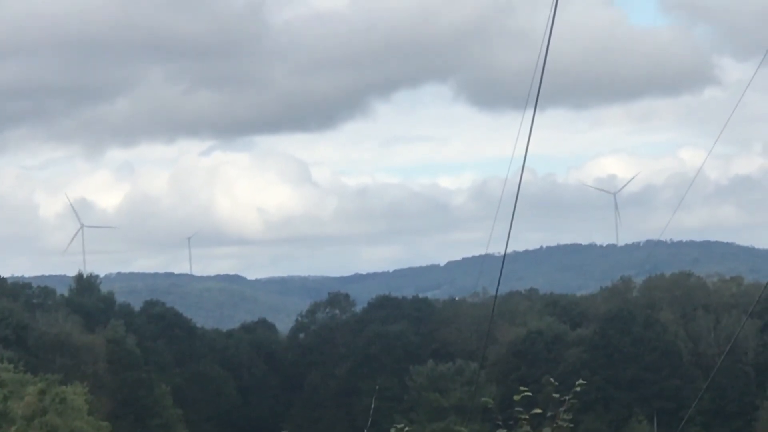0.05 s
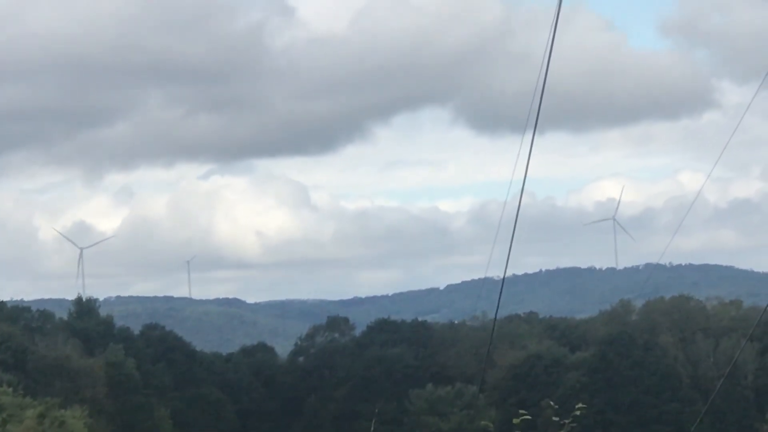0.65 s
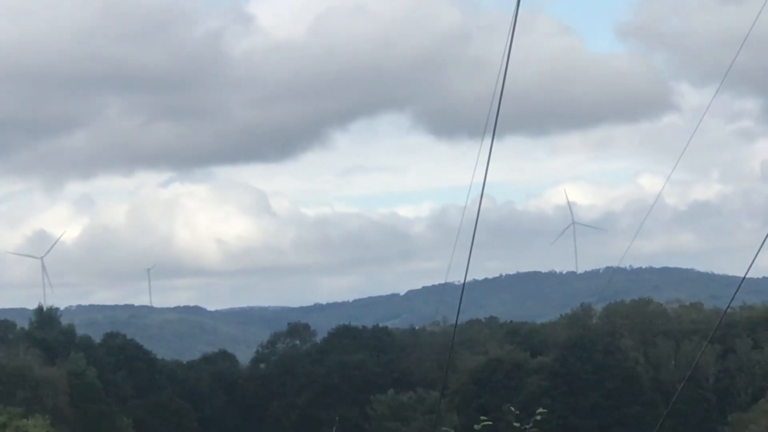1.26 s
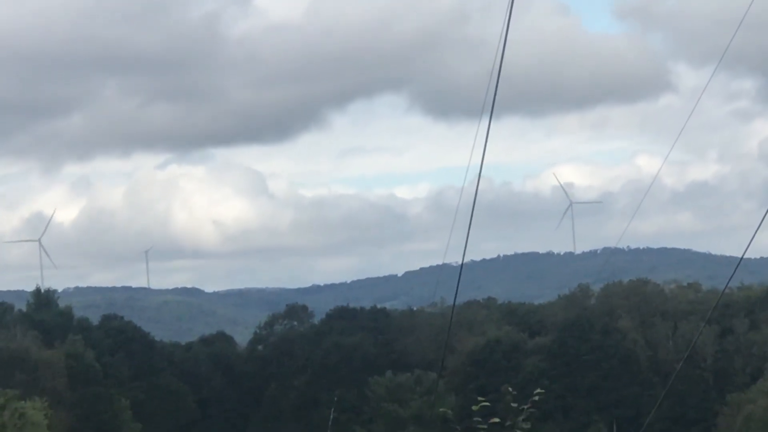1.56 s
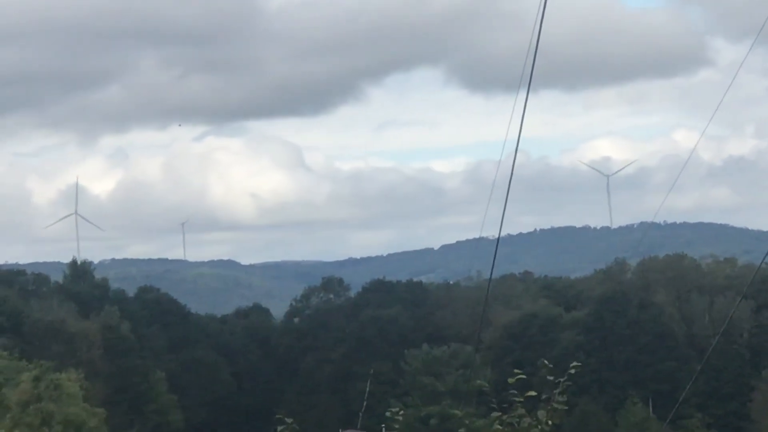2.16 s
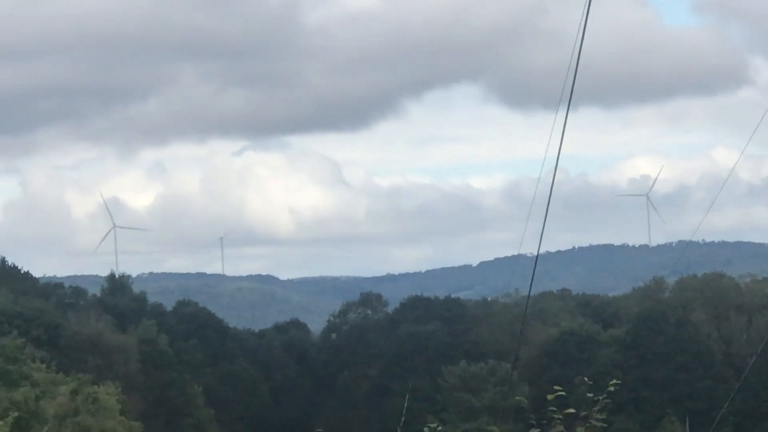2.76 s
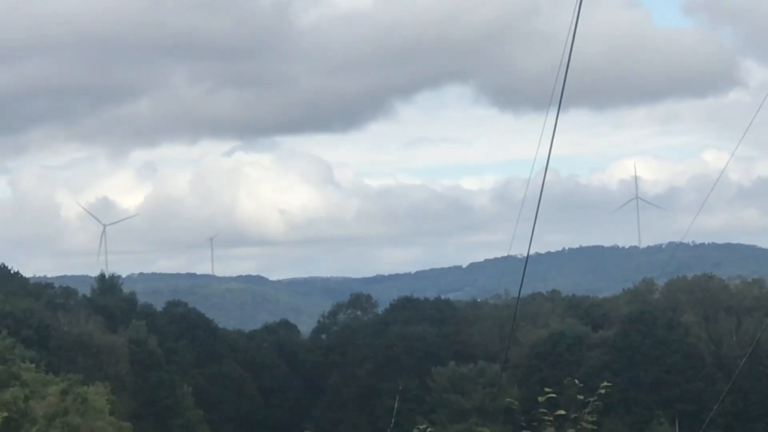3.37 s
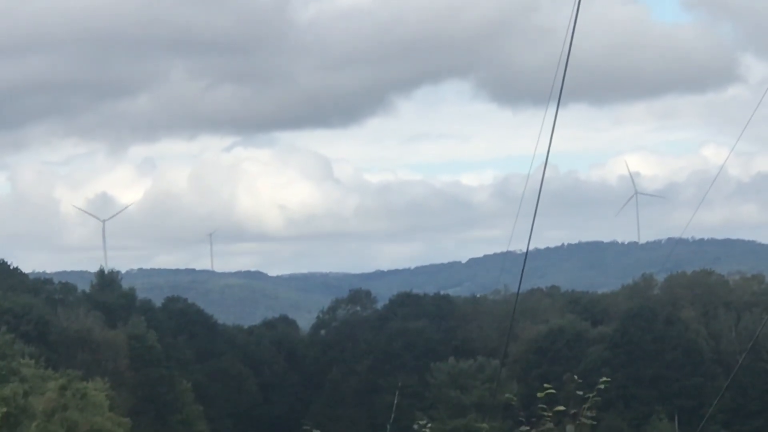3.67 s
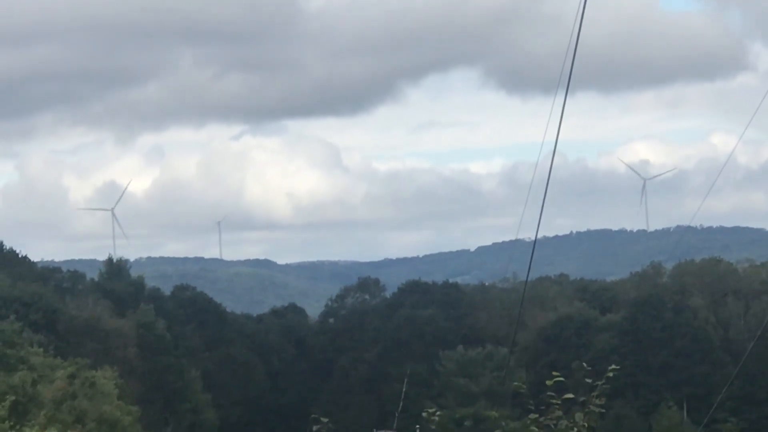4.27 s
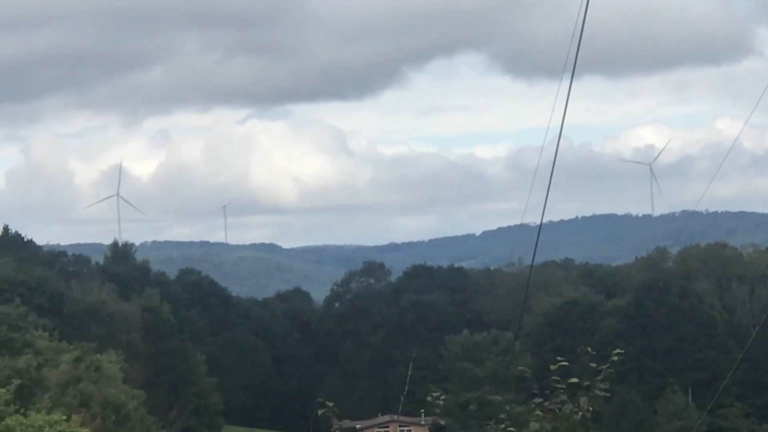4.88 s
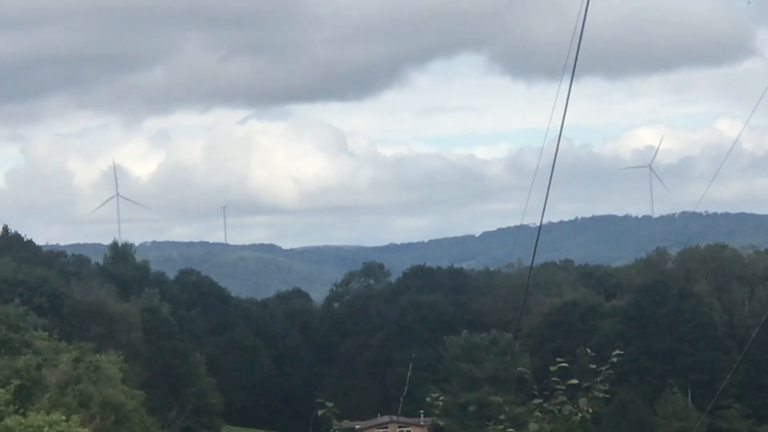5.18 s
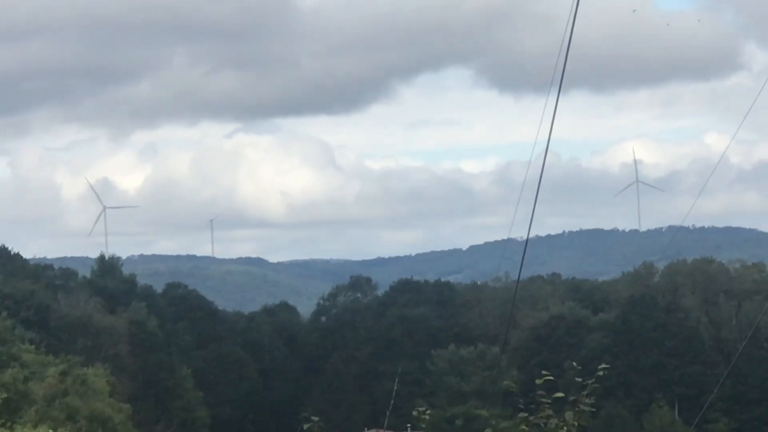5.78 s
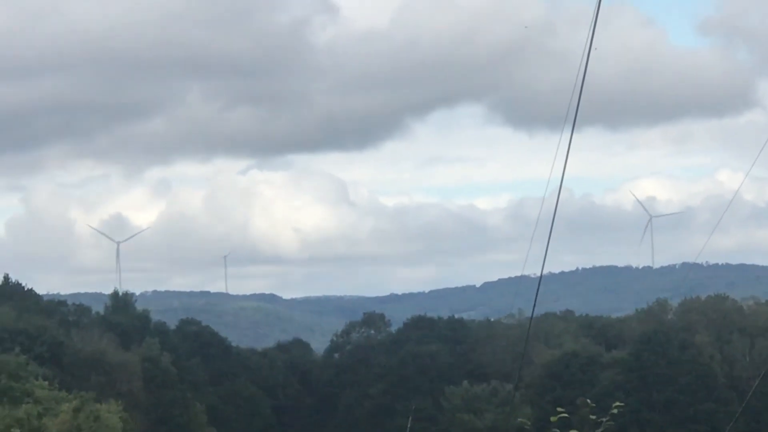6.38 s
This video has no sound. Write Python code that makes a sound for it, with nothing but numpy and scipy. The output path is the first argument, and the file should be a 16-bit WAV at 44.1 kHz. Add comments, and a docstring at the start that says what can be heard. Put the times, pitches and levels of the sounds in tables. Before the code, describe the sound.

From start to end, about six and a half seconds, insects sing on a wooded hillside. A nearby cricket holds a fast, high, unbroken trill. A nearby katydid pulses much higher, about twenty times a second, faltering briefly at around 2.4 seconds. Farther off, crickets merge into a soft shimmer and other katydids drift in and out of step, one growing louder toward the end. Faint, very high ticking comes in phrases about a second long.

Underneath, a distant propeller plane drones with a dull roar, slowly sinking in pitch, its hum fading and returning several times. A far bird gives two very faint, thin falling whistles at about 3.3 and 5 seconds. Light wind touches the microphone with soft low rumbles, a little stronger around 2 seconds and from 4.4 seconds on, over a faint even hiss.

```python
"""A near tree cricket trills on a wooded hillside; a near katydid pulses and falters once, and others
answer from farther off. All sing by stridulation: each wing stroke drags a scraper over a file and
gives one short gliding tone, which the foliage scatters. A distant propeller plane drones, slowly
sinking in pitch; a far bird whistles twice, and light wind touches the microphone."""
import sys
import numpy as np
from scipy import signal
from scipy.fft import rfft, irfft, next_fast_len
from scipy.io import wavfile
from scipy.ndimage import map_coordinates

SR = 44100
rng = np.random.default_rng(int(sys.argv[2]) if len(sys.argv) > 2 else 0)


def pcm_store(signal):
    """Save signal as 16-bit PCM."""
    levels = np.round(np.clip(np.atleast_2d(signal), -1, 1) * 32767)
    wavfile.write(sys.argv[1], SR, levels.astype(np.int16).T)


N = 283563

# One katydid wing stroke, timed from its middle: offset_s, tooth_rate_hz, relative_db
KATYDID_WING_STROKE = [(-.012, 8200, -35), (-.008, 8280, -10), (-.005, 8340, -1), (-.002, 8490, 0),
                       (.001, 8580, 0), (.004, 8500, -1), (.008, 8150, -5), (.010, 7850, -17),
                       (.014, 7300, -40)]


def near_cricket():
    """Stridulation: a fast trill of falling tones from a wing that radiates little below resonance."""
    # Unbroken run of wing strokes: time_s, stroke_count
    run = [(-.0018, 0), (1.2954, 70), (2.7781, 150), (3.7983, 205), (5.0079, 270), (6.4237, 346)]
    # One wing stroke, timed from its middle: offset_s, tooth_rate_hz, relative_db
    stroke = [(-.0068, 4350, -35), (-.0048, 4210, -8), (-.0015, 4060, 0), (.0015, 3955, 0),
              (.0038, 3840, -5), (.0052, 3780, -16), (.0065, 3740, -40)]
    envelope, phase = stridulation(stroke_times(run), stroke, spread_db=.68, detune=.002,
                                   flutter_hz=13, flutter_db=.5, slip_rad=1)
    phase += 2.5 * wobble(12)  # the phase wanders slowly
    wing = np.sin(phase) + amp(-30.5) * np.sin(2 * phase) + amp(-29.5) * np.sin(3 * phase)
    trill = filtered(envelope * wing, lambda hz: amp(np.interp(hz, [3600, 3720], [-25, 0])))
    return amp(-57) * foliage(trill, wet_db=-13.5, t60_s=.058)


def near_katydid():
    """Stridulation: about twenty arched tones a second, with a faint rasp of the file."""
    # Wing strokes before the falter: time_s, stroke_count
    first_run = [(.0119, 0), (.4119, 8), (1.3061, 26), (2.1527, 43), (2.3535, 47)]
    # Wing strokes after it: time_s, stroke_count
    second_run = [(2.5074, 0), (2.6494, 3), (2.999, 10), (3.552, 21), (3.9964, 30), (5.0933, 52),
                  (5.5858, 62), (6.4335, 79)]
    times = np.concatenate([stroke_times(first_run), stroke_times(second_run)])
    envelope, phase = stridulation(times, KATYDID_WING_STROKE, spread_db=.7, detune=.002,
                                   flutter_hz=40, flutter_db=1.4, slip_rad=2)
    rasp = noise([(5000, -30), (7200, -16), (8500, 5.5), (9300, -2.5), (10500, -10), (12000, -18),
                  (15000, -22)])
    wing = unit(np.sin(phase)) + amp(-20 + 3 * wobble(23)) * rasp
    return amp(-57.5) * foliage(envelope * wing, wet_db=-19, t60_s=.23)


def far_crickets():
    """Incoherent summation: many crickets merge into a shimmer under one higher, faster trill."""
    # One wing stroke: offset_s, tooth_rate_hz, relative_db
    stroke = [(-.007, 4660, -30), (-.0045, 4530, -8), (-.001, 4445, 0), (.002, 4390, -1),
              (.007, 4260, -25)]
    times = steady_times(rate_hz=61.3, jitter=.0087)
    envelope, phase = stridulation(times, stroke, spread_db=.5, detune=.0012,
                                   flutter_hz=10, flutter_db=1, slip_rad=1)
    trill = foliage(envelope * np.sin(phase), wet_db=-8, t60_s=.16)
    # Spectrum of the hillside's many crickets: frequency_hz, density_db
    chorus = [(3400, -49), (3750, -8.5), (4000, -8), (4250, 4.5), (4500, -7), (4700, -6), (4900, -27),
              (5400, -45.5)]
    return amp(-68.5) * trill + amp(-72) * noise(chorus)


def far_katydids():
    """Independent rhythms: a rival drifts in and out of step with the near singer; two keep their beat."""
    # The rival's wing strokes: time_s, stroke_count
    rival_run = [(.024, 0), (2.39, 47), (3.54, 70), (5.71, 113), (6.41, 127)]
    # The rival's strength: time_s, level_db
    rival_levels = [(0, -79), (2.2, -72.5), (4.8, -72), (5.5, -70), (6.43, -66.5)]
    # The two other singers: stroke_rate_hz, pitch_ratio, level_db
    singers = [(18.1, 0.94, -81), (18.7, 0.855, -85)]
    rival = far_katydid(stroke_times(rival_run), pitch_ratio=1.012, level_db=curve(rival_levels))
    others = sum(far_katydid(steady_times(hz, jitter=.026), ratio, db) for hz, ratio, db in singers)
    return rival + others


def far_katydid(times, pitch_ratio, level_db):
    """Scattering blurs the arched strokes: at a distance more of the sound arrives indirectly."""
    envelope, phase = stridulation(times, KATYDID_WING_STROKE, spread_db=1.3, detune=.0035,
                                   flutter_hz=53.7, flutter_db=1.3, slip_rad=1.8)
    return amp(level_db) * foliage(envelope * np.sin(pitch_ratio * phase), wet_db=-7, t60_s=.22)


def ticking_katydid():
    """Stridulation in brief strokes: high ticks over a soft scrape, in phrases about a second long."""
    # Phrases of the song: start_s, end_s, level_db
    phrases = [(0, 0.823, -74), (1.322, 2.282, -77), (3.125, 4.02, -76), (4.55, 5.65, -77),
               (6.15, 6.434, -76)]
    # One tick: offset_s, tooth_rate_hz, relative_db
    tick = [(-.001, 15200, -25), (-.0002, 15050, 0), (.0002, 14950, 0), (.0014, 14400, -25)]
    t = np.arange(N) / SR
    ease_s = .07
    phrasing = sum(amp(db) * np.clip(np.minimum(t - start, end - t) / ease_s + .5, 0, 1)
                   for start, end, db in phrases)
    times = steady_times(rate_hz=56.5, jitter=.015)
    envelope, phase = stridulation(times, tick, spread_db=2.5, detune=.012,
                                   flutter_hz=200, flutter_db=1.5, slip_rad=2)
    scrape = noise([(9000, -39), (11500, -10), (12700, -5), (13700, -11.5), (14400, -9.5),
                    (15200, 1.5), (15800, -5), (16200, -34)])
    return phrasing * unit(scrape + amp(-.5) * unit(envelope * np.sin(phase)))


def propeller():
    """Multipath interference: the blade tone fades and returns as its paths through the air shift."""
    # The sinking pitch: time_s, blade_rate_hz
    blade_rates = [(0, 130.7), (1.8, 127.6), (3.3, 124.6), (4, 122), (6.43, 115.4)]
    # The deep hum of the fundamental: time_s, relative_db
    hum = [(0, -47.5), (.55, -52.5), (.9, -45.5), (1.06, -52.5), (1.2, -44), (1.46, -45.5), (1.6, -41.5),
           (1.85, -40.5), (2.3, -47.5), (2.65, -44.5), (2.84, -51.5), (3.17, -41.5), (3.55, -46),
           (4.08, -43), (4.68, -46.5), (5, -41.5), (5.12, -49.5), (5.3, -46), (5.85, -46.5), (6.1, -43),
           (6.43, -58)]
    # The second harmonic, carrying better as the plane nears: time_s, relative_db
    second = [(0, -68), (.9, -65.5), (1.25, -77), (1.72, -60.5), (2.15, -77), (2.6, -65.5), (3.42, -69.5),
              (3.58, -56.5), (4.05, -63), (4.4, -62.5), (4.8, -71), (5.5, -67), (5.85, -59.5), (6.2, -58),
              (6.43, -61)]
    # The third harmonic, likewise: time_s, relative_db
    third = [(0, -75.5), (.5, -68), (1.05, -84.5), (1.4, -68), (1.8, -74), (2.98, -69.5), (3.15, -55.5),
             (3.55, -56.5), (3.78, -65), (3.95, -60), (4.6, -61), (4.9, -72), (5.47, -59.5), (6.1, -61.5),
             (6.43, -68.5)]
    # Cancellations of the hum: time_s, half_width_s
    fades = [(.71, 0.056), (2.48, 0.16), (3.829, 0.15), (5.6, 0.2), (6.45, 0.28)]
    fade_floor, scatter_rad = .079, .045
    t = np.arange(N) / SR
    phase = 2 * np.pi * np.cumsum(curve(blade_rates)) / SR
    fading = np.prod([np.hypot(fade_floor, np.tanh((t - s) / width)) for s, width in fades], axis=0)
    gains = [fading * amp(curve(hum) + .57 * wobble(13)),
             amp(curve(second) + 2.3 * wobble(10)),
             amp(curve(third) + 2.3 * wobble(14))]
    # Turbulent air shakes the phase, more for each higher harmonic.
    drone = sum(gain * unit(np.sin(k * (phase + scatter_rad * wobble(25))))
                for k, gain in enumerate(gains, 1))
    return amp(-.61) * drone


def plane_roar():
    """Broadband flow noise: a dull roar, and a slipstream rush that peaks once as the plane passes."""
    # Strength of the roar: time_s, level_db
    roar_levels = [(0, -61.5), (1.9, -59), (2.9, -63.5), (3.55, -54.5), (4.1, -57.5), (5.5, -61),
                   (6.05, -57.5), (6.43, -62)]
    # Spectrum of the roar: frequency_hz, density_db
    roar_spectrum = [(40, -31), (75, -7), (110, 0), (170, 0), (230, -3.5), (300, -11.5), (420, -17.5),
                     (700, -45)]
    # Spectrum of the slipstream: frequency_hz, density_db
    rush_spectrum = [(200, -20), (380, 6), (470, -6), (580, 2), (680, -5.5), (800, -16.5), (1300, -32.5)]
    roar = amp(curve(roar_levels) + 1.1 * wobble(4)) * noise(roar_spectrum)
    rush_db = -71.5 + 3.5 * swell(peak_s=4.5, half_width_s=1.9) + wobble(7.6)
    return roar + amp(rush_db) * noise(rush_spectrum)


def bird():
    """Reverberation smears thin falling whistles from deep in the wood."""
    # Whistles: start_s, length_s, first_hz, last_hz, level_db
    whistles = [(3.261, .48, 3510, 3130, -86), (5.05, 0.73, 3350, 3068, -91)]
    t = np.arange(N) / SR
    calls = np.zeros(N)
    for start_s, length_s, first_hz, last_hz, level_db in whistles:
        progress = np.clip((t - start_s) / length_s, 0, 1)
        pitch_hz = first_hz + (last_hz - first_hz) * progress + 35 * wobble(90)
        envelope = amp(level_db) * np.sqrt(2 * np.abs(np.sin(np.pi * progress)))
        calls += envelope * np.sin(2 * np.pi * np.cumsum(pitch_hz) / SR)
    return np.std(calls) * foliage(calls, wet_db=0, t60_s=.53)


def wind():
    """Turbulent pressure fluctuations buffet the microphone softly, over an even hiss."""
    # Gusts: peak_s, half_width_s, relative_db
    gusts = [(.9, .06, -62), (1.14, 0.043, -60), (1.5, .15, -62), (2.065, .04, -58), (2.35, 0.067, -57.5),
             (4.437, .06, -54.5), (4.9, 0.44, -59.5), (6.1, 0.34, -59)]
    # Spectrum of the buffeting: frequency_hz, density_db
    buffet_spectrum = [(15, -47), (28, -10), (40, -1.5), (56, 1.5), (80, -10), (130, -25.5), (300, -69)]
    # Spectrum of the hiss: frequency_hz, density_db
    hiss_spectrum = [(100, -4), (800, 1), (1200, -1), (2000, -5), (2800, -9), (3400, -5), (5200, -6.5),
                     (6400, -11), (9000, -10.5), (10500, -12), (12700, -5.5), (14000, -4), (15800, -9)]
    breeze = amp(-69.5)
    strength = breeze + sum(amp(db) * swell(s, width) for s, width, db in gusts)
    buffets = strength * amp(-2.5 + 1.5 * wobble(11)) * noise(buffet_spectrum)
    return buffets + amp(-72) * noise(hiss_spectrum)


def stridulation(times, stroke, spread_db, detune, flutter_hz, flutter_db, slip_rad):
    """Envelope and phase of a scraper running unevenly over a file: the tooth rate sets the pitch."""
    t = np.arange(N) / SR
    nearest = np.searchsorted((times[1:] + times[:-1]) / 2, t)
    # Each stroke has its own strength, pitch, speed and starting phase.
    strength, pitch, speed, slip = rng.standard_normal((len(times), 4))[nearest].T
    offset_s = (t - times[nearest]) * (1 + .027 * speed)
    stroke_s, stroke_hz, stroke_db = np.transpose(stroke)
    contour_db = np.interp(offset_s, stroke_s, stroke_db, left=-120, right=-120)
    envelope = amp(contour_db + spread_db * strength + flutter_db * wobble(450))
    tooth_hz = np.interp(offset_s, stroke_s, stroke_hz) * (1 + detune * pitch) + flutter_hz * wobble(600)
    cycles = np.cumsum(tooth_hz) / SR
    cycles -= np.interp(times, t, cycles)[nearest]  # every stroke meets the file anew
    return unit(envelope), 2 * np.pi * cycles + slip_rad * slip


def foliage(x, wet_db, t60_s):
    """Diffuse scattering by leaves and trunks adds a decaying tail; the sum has rms 1."""
    t = np.arange(SR // 2) / SR
    tail = rng.standard_normal(len(t)) * amp(-60 * t / t60_s) * (1 - np.exp(-t / .00071))
    return unit(x + amp(wet_db) * unit(signal.fftconvolve(x, tail)[:N]))


def stroke_times(run):
    """The time of every stroke, interpolated from rows of time_s, stroke_count."""
    time_s, count = np.transpose(run)
    return np.interp(np.arange(count[-1] + 1), count, time_s)


def steady_times(rate_hz, jitter):
    """Stroke times of a singer whose period varies a little at random."""
    count = int(rate_hz * N / SR) + 3
    return (np.cumsum(1 + jitter * rng.standard_normal(count)) - 1) / rate_hz


def noise(spectrum):
    """White noise shaped by rows of frequency_hz, density_db, then scaled to rms 1."""
    frequency_hz, density_db = np.transpose(spectrum)
    white = rng.standard_normal(N)
    return unit(filtered(white, lambda hz: amp(np.interp(np.log(hz + 1), np.log(frequency_hz), density_db))))


def filtered(x, response):
    """Linear filtering: the spectrum of x times a frequency response."""
    size = next_fast_len(N + SR // 2)
    return irfft(rfft(x, size) * response(np.fft.rfftfreq(size, 1 / SR)), size)[:N]


def curve(rows):
    """Linear interpolation of rows of time_s, value at every sample."""
    return np.interp(np.arange(N) / SR, *np.transpose(rows))


def wobble(rate_hz):
    """A smooth random curve with rate_hz knots a second."""
    knots = rng.standard_normal(int(N * rate_hz / SR) + 4)
    return map_coordinates(knots, [np.arange(N) * rate_hz / SR])


def swell(peak_s, half_width_s):
    """A Gaussian rise to 1 and fall back to 0."""
    return np.exp(-((np.arange(N) / SR - peak_s) / half_width_s) ** 2)


def amp(db):
    """Decibels to gain."""
    return 10 ** (np.asarray(db) / 20)


def unit(x):
    """Scale to rms 1."""
    return x / np.sqrt(np.mean(x ** 2) + 1e-20)


def scene():
    """Superposition: the pressures of all sources add at one microphone."""
    insects = near_cricket() + far_crickets() + near_katydid() + far_katydids() + ticking_katydid()
    return (insects + bird() + propeller() + plane_roar() + wind())[None]


def record(dry):
    """Band limiting: an ideal low-pass filter passes nothing above 15.8 kHz."""
    return filtered(dry[0], lambda hz: hz < 15800)[None]


dry = scene()
out = record(dry)
pcm_store(out)
```